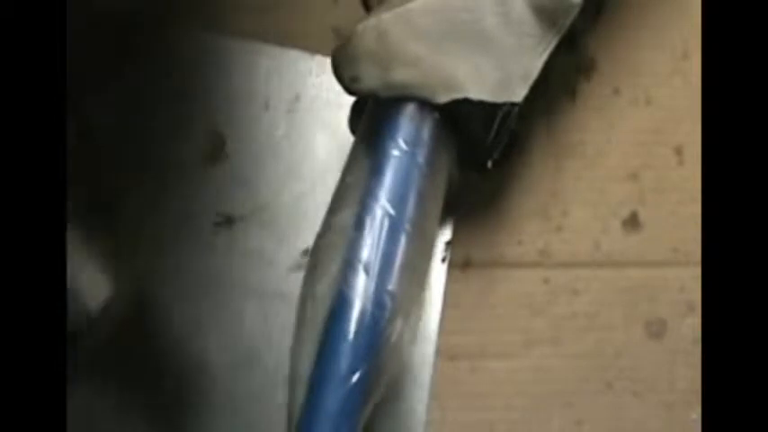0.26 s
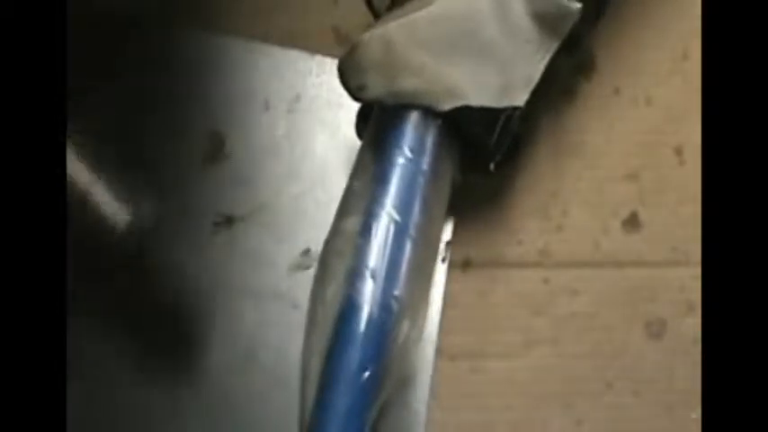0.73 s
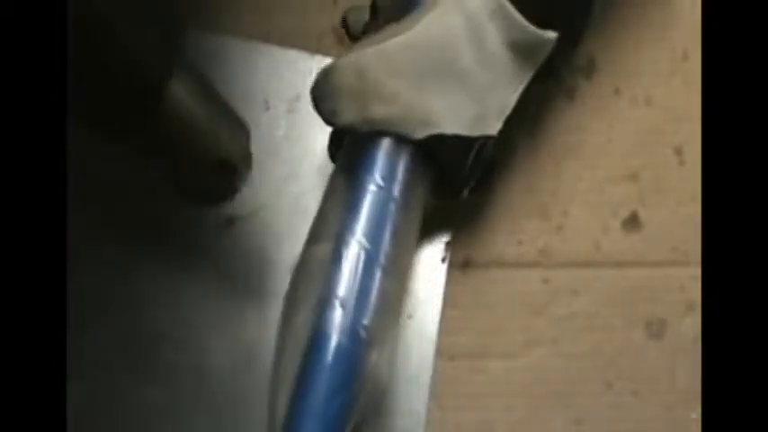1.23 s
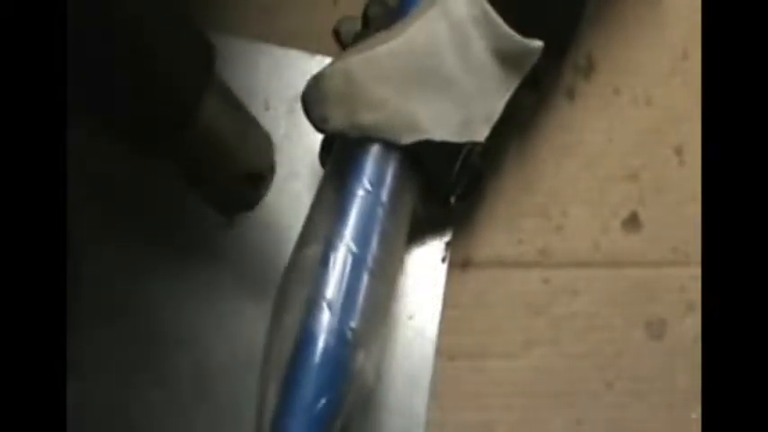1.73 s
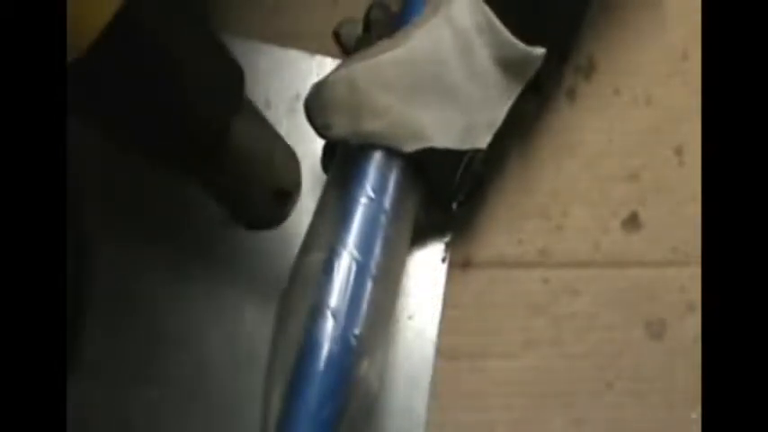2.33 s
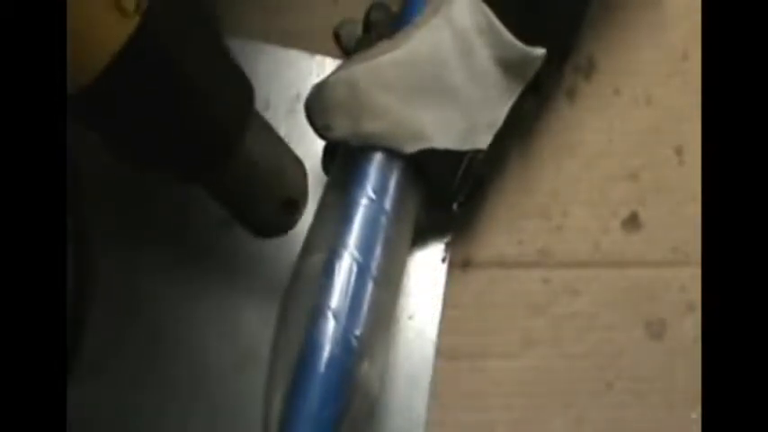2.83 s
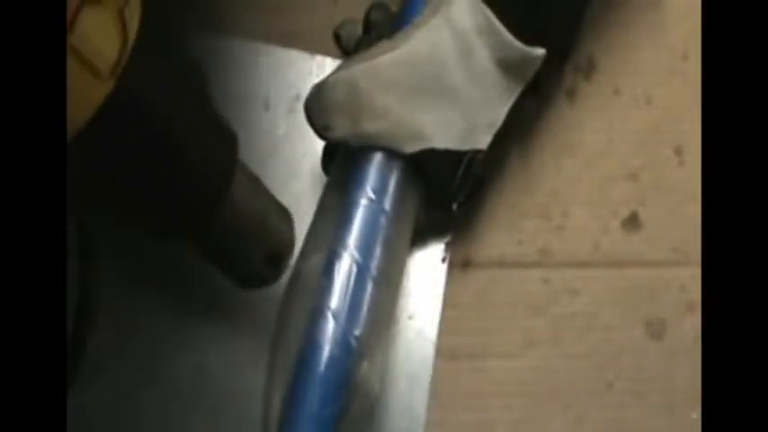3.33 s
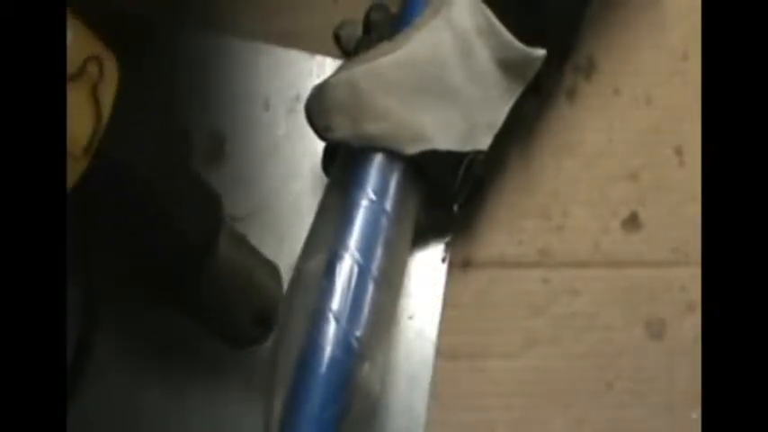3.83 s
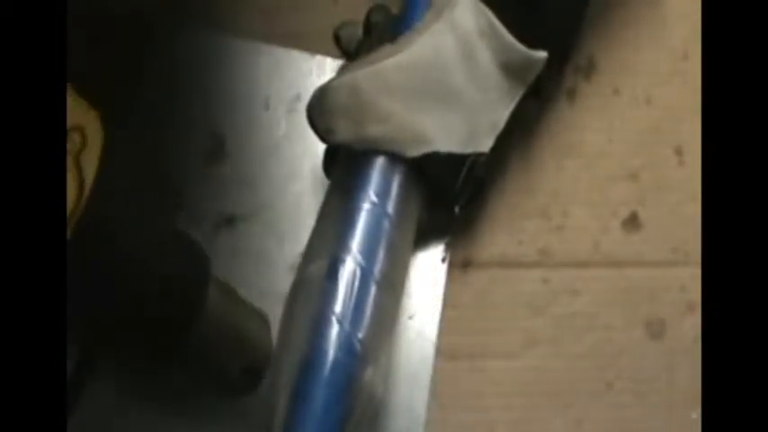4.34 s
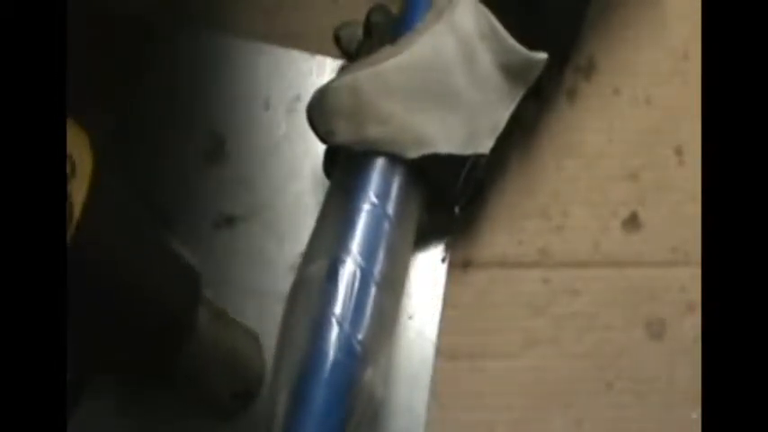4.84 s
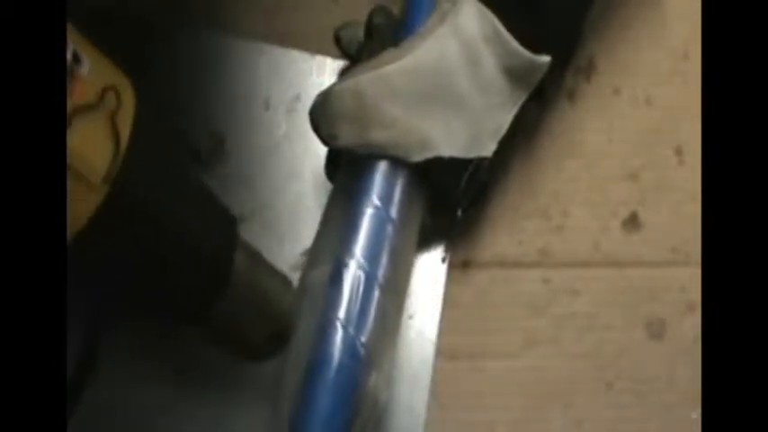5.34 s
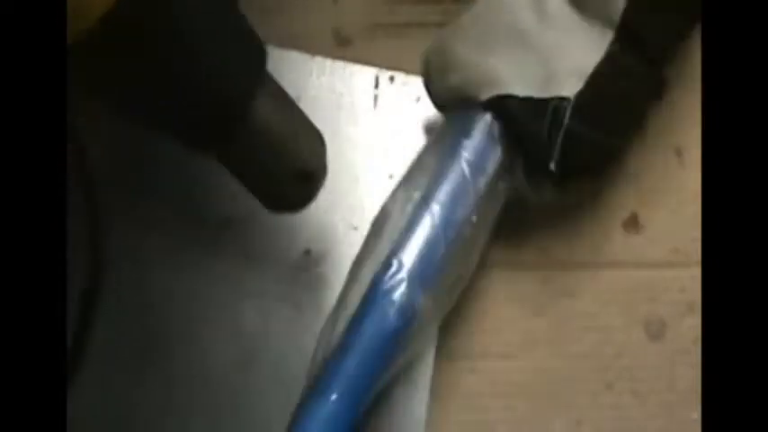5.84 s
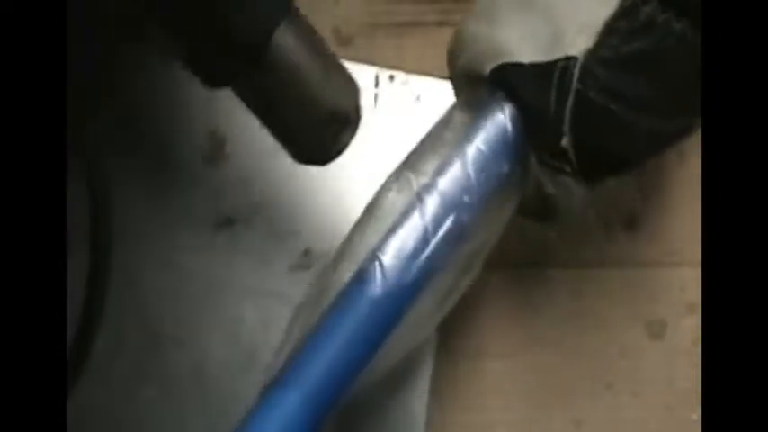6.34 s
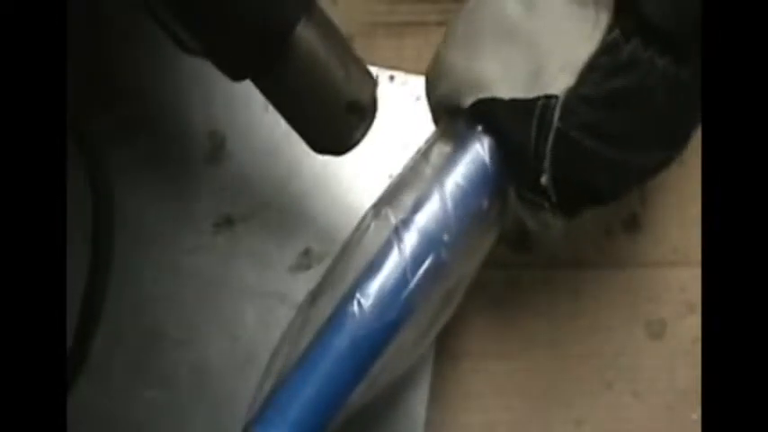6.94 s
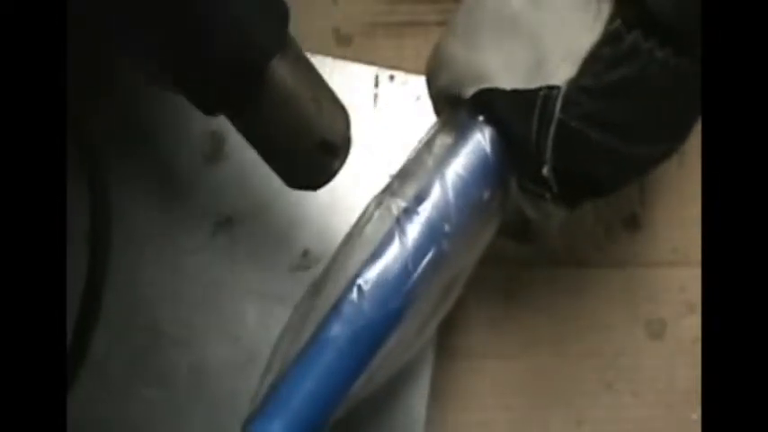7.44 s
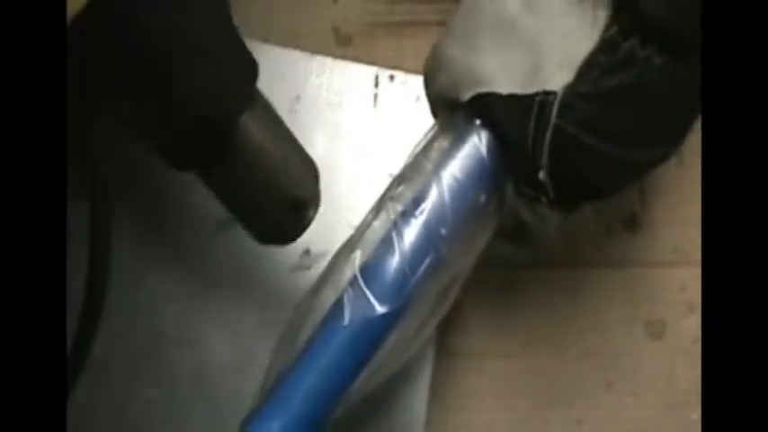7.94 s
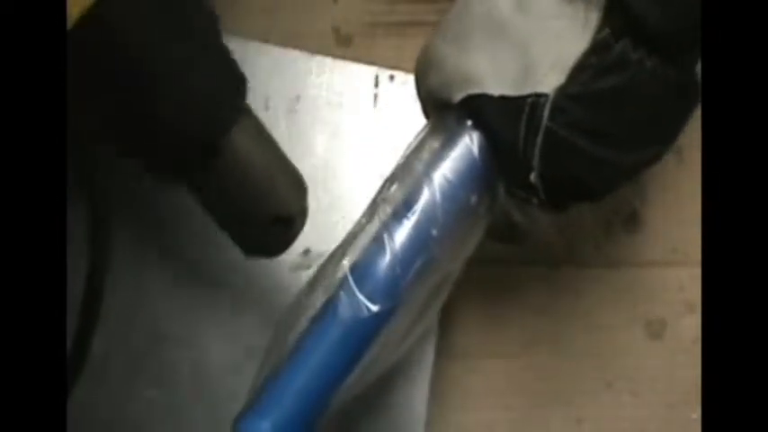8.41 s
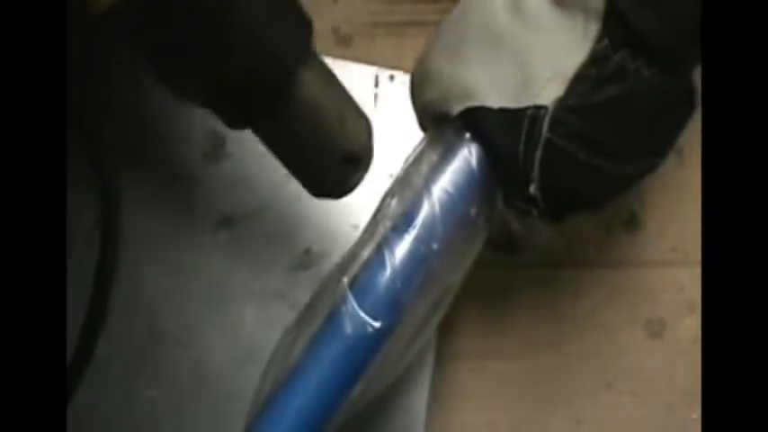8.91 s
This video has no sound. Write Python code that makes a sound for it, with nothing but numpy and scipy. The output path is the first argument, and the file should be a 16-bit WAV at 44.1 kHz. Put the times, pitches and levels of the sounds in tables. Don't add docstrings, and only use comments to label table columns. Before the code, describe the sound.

Close-up of a hot-air gun: fading air, several small plastic clicks, then a sharp switch snap and rapid rising whine. Steady turbulent air shifts in colour as the gun is waved near plastic, with tiny dropouts. After a dull bench knock the sound cuts to a sped-up, shriller version. Distant horn chords sound twice, faintly, above low workshop rumble and engine drone. A small camera captures it in stereo.

```python
import sys
import numpy as np
from scipy import signal
from scipy.fft import rfft, irfft, next_fast_len
from scipy.io import wavfile
from scipy.ndimage import uniform_filter1d, minimum_filter1d, map_coordinates

SR = 44100
rng = np.random.default_rng(int(sys.argv[2]) if len(sys.argv) > 2 else 0)


def volts(x):
    e = np.asarray(x, float) / 20
    return 10 ** e


def transcribe(u):
    v = np.clip(np.atleast_2d(u).T, -1, 1)
    q = np.round(v * 32767).astype(np.int16)
    wavfile.write(sys.argv[1], SR, q)


N = 404397
T = np.arange(N) / SR

NORMAL, FAST = 1, 1.7
SCENE_CHANGE_S, NEW_POSE_S = 5.26, 5.855
ON_S = 0.4615
BESIDE = np.array([[0.5], [-0.5]])

PART_EDGES_HZ = [488, 1400, 2400, 4400, 10040]
FILL_S = [0.17, 0.22, 0.17, 0.12]
# time_s, jet_towards_microphone_db, fan_towards_microphone_db, lean_to_left_db
POSE = [(.75, -1, 0, 0.7), (1.0, -1, -1, -0.2), (1.35, 0.5, 3, 0), (1.83, -0.5, -4.5, -0.5),
        (2.1, 1.5, 1, -0.5), (2.95, 1, -1.5, -0.5), (3.3, 1.5, 3.5, -0.2), (3.75, 0.5, 3.5, 0),
        (4.3, 0.5, 4, 0.5), (4.7, 0, 5.5, 0.5), (5.2, -0.5, 4.5, 0), (5.55, 2, 5, -0.5), (5.9, -1.5, 1, -1),
        (6.4, -1.5, 0.5, -1.5), (7.3, 0, 2.5, -1), (8.2, -0.5, 2, -0.5), (8.7, 0.5, 2, -1.5),
        (9.1, 1, 4, -1.3)]


def unit(x):
    return x / np.sqrt(np.mean(x ** 2) + 1e-20)


def steady(x):
    power = uniform_filter1d(np.mean(x ** 2, axis=0), size=SR // 3)
    return x / np.sqrt(np.abs(power) + 1e-20)


def along(points, hz):
    f, v = np.transpose(points)
    return np.interp(np.log(hz + 1), np.log(f + 1), v)


def curves(rows):
    s, *columns = np.transpose(rows)
    return [np.interp(T, s, column) for column in columns]


def wobble(rate):
    coarse = T[::16]
    knots = rng.standard_normal(int(N * rate / SR) + 4)
    return np.interp(T, coarse, map_coordinates(knots, [coarse * rate]))


def filtered(x, response):
    m = next_fast_len(N + 8192)
    return irfft(rfft(x, m) * response(np.fft.rfftfreq(m, 1 / SR)), m)[..., :N]


def blurred_noise(shape, across, along_time):
    field = uniform_filter1d(rng.standard_normal(shape), size=across, axis=0)
    return uniform_filter1d(field, size=along_time, axis=1)


def rush(colour, speed, patchy_db):
    # pitch_hz, likeness (0 to 1)
    likeness = [(30, 0.76), (60, 0.94), (150, 0.68), (300, 0.85), (700, 0.89), (2000, 0.82), (5000, 0.93),
                (9000, 0.78)]
    z = signal.stft(rng.standard_normal((2, N)), nperseg=1024)[2]
    patches = unit(blurred_noise(z.shape[1:], 4, 36))
    fine = unit(blurred_noise(z.shape[1:], 2, 12))
    hz = np.linspace(0, SR / 2, len(fine))[:, None]
    depth = np.clip(hz / (speed * 2250) - 0.5, 0, 1)
    streaks_db = 2.5 * np.minimum(fine, 0.7)
    holes_db = -14 * (fine < -2.1)
    gain_db = patchy_db * patches + depth * (streaks_db + holes_db)
    pair = signal.istft(z * volts(gain_db), nperseg=1024)[1][:, :N]

    def spread(hz):
        angle = np.arccos(np.clip(along(likeness, hz / speed), -1, 1)) / 2
        return colour(hz) * [np.cos(angle), np.sin(angle)]

    mid, side = filtered(pair, spread)
    return np.array([mid + side, mid - side])


def power_db(fill_s, coast_db_per_s=-70, rest_db=-28):
    coasting = -3 + coast_db_per_s * T
    climbing = -22.5 * np.exp((ON_S - T) / fill_s)
    climbing = climbing - 5 * np.clip((0.562 - T) / 0.012, 0, 1)
    return np.maximum(np.where(T < ON_S, coasting, climbing), rest_db)


def shop(level_db, rumble, speed):
    db = level_db + 0.23 * power_db(0.81) + 4.5 * np.exp(-T / 0.29)
    return volts(db) * steady(rush(lambda hz: volts(along(rumble, hz)), speed, patchy_db=1.0))


def engine_hum():
    # time_s, level_db
    load = [(5.3, -52), (6.2, -55.5), (6.45, -45.5), (7.7, -46.5), (7.9, -65), (8.07, -42), (9.1, -45)]
    phase = 2 * np.pi * 158.8 * T + 1.0 * wobble(4) + BESIDE / 2
    return volts(curves(load)[0] + 4.0) * np.sin(phase)


def locomotive_drone():
    # pitch_hz, level_db
    firing = [(43.7, -45.5), (58.2, -46.5), (72.7, -54.5), (87.2, -50), (102, -68), (116.4, -52.5),
              (189, -52)]
    out = 0
    for hz, db in firing:
        level_db = db + 2.5 + 1 * (T - 7.5) + 1.9 * wobble(1.8)
        phase = 2 * np.pi * (hz * T + rng.random()) + 0.11 * wobble(2.7)
        out = out + volts(level_db) * np.sin(phase)
    return out


def train_horn():
    pipe_hz = [331, 389, 520.5, 662.3]
    pipe_db = [-50, -53, -48, -52]
    # pipe_number, peak_s, half_length_s, level_db
    echo_swells = [(0, 6.13, .25, 7), (0, 7.3, .12, 7), (0, 7.88, 0.12, 6), (0, 8.27, 0.092, 4.5),
                   (1, 6.27, .16, 12), (1, 8.02, 0.12, 11.5), (1, 8.27, 0.11, 6), (2, 5.66, 0.069, -2),
                   (2, 6.05, 0.21, 14), (2, 5.4, 0.14, 5), (2, 7.33, 0.16, 7), (2, 7.58, 0.058, 0),
                   (2, 7.76, .06, 8), (2, 8.06, 0.076, 7), (3, 5.3, .1, 7), (3, 5.68, 0.15, 5),
                   (3, 6, 0.35, 13.5), (3, 7.58, 0.069, 15), (3, 7.78, .13, 12), (3, 8.15, .07, 16),
                   (3, 8.36, .09, 10)]
    # start_s, end_s
    blasts = [
        (4.98, 6.4),
        (7.05, 8.5),
    ]
    speed = np.where(T < SCENE_CHANGE_S, NORMAL, FAST)
    blowing = sum(np.clip(np.minimum(T - a, b - T) / 0.067, 0, 1) for a, b in blasts)
    out = 0
    for k, hz in enumerate(pipe_hz):
        tone = np.sin(2 * np.pi * hz * np.cumsum(speed) / SR + 0.41 * wobble(9.6) + BESIDE)
        level_db = pipe_db[k] + 6.0 + 1.5 * wobble(9)
        for pipe, s, half, db in echo_swells:
            if round(pipe) == k:
                level_db = level_db + db * np.exp(-((T - s) / half) ** 2)
        out = out + blowing * volts(level_db) * tone
    return out


def outside():
    return train_horn() + (T > SCENE_CHANGE_S) * (engine_hum() + locomotive_drone())


def handling():
    # pitch_hz, width_hz, level_db
    handle_modes = [(2250, 500, -3), (3250, 400, 2), (5760, 500, -3), (8300, 500, 0)]
    # start_s, peak_db, low_knock_db,
    # fade_by_60_db_s
    clicks = [(0.1392, -18, 7.5, 0.03), (.244, -21, 0, .03), (.304, -35, -17, .03),
              (0.3606, -15.5, -30, 0.018), (.389, -25, -4, .03), (.424, -25, -20, 0.52),
              (0.45, -20.5, -20, 0.13), (0.4619, -12, -30, 0.039)]
    # pitch_hz, level_db, fade_by_60_db_s
    contact_modes = [(706, -11.5, 0.047), (1490, -17, 0.044), (2450, -27, 0.041), (2750, -18, 0.044),
                     (3300, -11, 0.035), (3900, -2, 0.03), (4140, -1.5, 0.025), (5730, -15, .022),
                     (8470, -8, 0.032)]
    # start_s, level_db, pitch_hz, fade_by_60_db_s
    bumps = [
        (4.87, -18, 54, 0.17),
    ]
    out = np.zeros(N)
    t = T[:SR // 4]
    f = np.fft.rfftfreq(len(t), 1 / SR)
    handle = 1
    for k, (c, w, db) in enumerate(handle_modes):
        handle = handle + (-1) ** k * volts(db) * 1j * f * w / (c * c - f * f + 1j * f * w)

    def add(s, sound):
        out[round(s * SR):][:len(t)] += sound

    for s, db, knock_db, t60 in clicks:
        burst = rng.standard_normal(len(t)) * volts(-60 * t / t60) * (1 - np.exp(-t / (0.03 * t60)))
        crack = irfft(rfft(burst) * handle, len(t))
        knock = volts(knock_db - 60 * t / 0.015) * np.sin(2 * np.pi * 860 * t) * (1 - np.exp(-t / 0.0015))
        add(s, volts(db) * (crack / np.abs(crack).max() + knock))
    snap = sum(volts(-10.5 + db - 60 * t / t60) * np.sin(2 * np.pi * hz * t) for hz, db, t60 in contact_modes)
    add(ON_S, (1 - np.exp(-t / 0.0012)) * snap)
    for s, db, hz, t60 in bumps:
        add(s, volts(db - 60 * t / t60) * np.sin(2 * np.pi * hz * t) * (1 - np.exp(-t / 0.01)))
    return volts(3 * BESIDE) * filtered(out, lambda hz: hz < PART_EDGES_HZ[-1])


def ports(x, speed):
    # pitch_hz, left_minus_right_db
    level_gap = [(60, 7.5), (300, -8), (640, 5), (1400, 2), (3100, 3), (6800, 0.4), (10000, 1)]
    # pitch_hz, left_leads_by_radians
    phase_gap = [(50, -0.068), (690, -0.66), (1210, -0.71), (1460, 0.047), (1810, -0.24), (2500, 0.88),
                 (3010, 0.22), (3620, -0.45), (7750, 0.39), (8870, 0.27)]

    def response(hz):
        gain = volts(BESIDE * along(level_gap, hz / speed))
        return gain * np.exp(1j * BESIDE * along(phase_gap, hz / speed))

    return filtered(x, response)


def stalls_db():
    # start_s, length_s, level_db
    stalls = [(1.159, 0.062, -3.5), (1.595, 0.087, -4), (1.694, 0.035, -5), (1.799, 0.043, -4),
              (1.838, 0.071, -3.5), (1.935, 0.01, -8), (2.004, 0.053, -4.5), (2.25, 0.021, -2),
              (2.692, 0.024, -4), (3.648, 0.069, -5), (3.87, 0.011, -9), (4.068, 0.016, -5),
              (4.729, 0.037, -5.5), (5.329, 0.015, -5), (5.493, 0.039, -2), (6.26, 0.012, -8),
              (6.308, 0.044, -6), (6.383, 0.029, -4), (6.582, 0.029, -5), (6.756, 0.021, -7.5),
              (6.807, 0.028, -5.5), (6.946, 0.044, -5.5), (7.469, 0.021, -4), (7.56, 0.059, -4.5),
              (7.699, 0.021, -6), (7.977, 0.014, -9), (8.059, 0.021, -6.5), (8.483, 0.011, -4),
              (8.719, 0.019, -7.5), (9.024, 0.013, -7.5)]
    out = 0
    for s, length, db in stalls:
        out = out + db * np.clip(np.minimum(T - s + 0.002, s + length + 0.0025 - T) / 0.0063, 0, 1)
    return out


def barrel(tone, pipes):
    def colour(hz):
        peaks = sum(volts(db / 3) * w * w / (w * w + 4 * (hz - c) ** 2) for c, w, db in pipes)
        return volts(along(tone, hz)) * (1 + 1.02 * peaks) * (hz < 15790)

    return colour


def airflow(colour, turns, speed, noise_db):
    coast_db_per_s = [-65, -66, -76, -58]
    resting_db = [-26, -26, -30, -23]
    jet_share = [0.075, .2, 0.95, .1]
    fan_share = [0.28, .15, 0.02, 0.083]
    roar = rush(colour, speed, patchy_db=0.8)
    mains_hz = 59.9
    throb = 1 + 0.078 * np.sin(2 * np.pi * mains_hz * speed * T) + 0.07 * np.sin(2 * np.pi * turns)
    flutter_db = 0.85 * stalls_db() + np.minimum(0.5 * wobble(20) + 1.1 * wobble(45), 1.3)
    jet_db, fan_db, _ = curves(POSE)
    out = 0
    for k, share in enumerate([0.19, 0.32, 0.95, 0.45]):
        low, high = PART_EDGES_HZ[k] * speed, PART_EDGES_HZ[k + 1] * speed
        part = filtered(roar, lambda hz: (hz > low) & (hz <= high))
        db = noise_db[k] + power_db(FILL_S[k], coast_db_per_s[k], resting_db[k])
        db = db + jet_share[k] * jet_db + fan_share[k] * fan_db + share * flutter_db
        out = out + volts(db) * steady(part) * throb ** share
    return out


def whine(turns, blade_db, twice_db, orders, rest_db, late_db):
    out = 0
    for multiple, db in orders:
        k = round(multiple)
        if k in (2, 3):
            continue
        if k in (5, 10):
            level_db = blade_db if k == 5 else twice_db
            blur = 0.03 * k
        else:
            level_db = rest_db + late_db * min(k / 16, 1) + db + 0.7 * wobble(2.524) + 0.15 * k * wobble(30)
            blur = 0.004 * k * k
        jitter = 0.61 * blur * wobble(90 if k > 12 else 40)
        tone = np.sin(2 * np.pi * (k * turns + rng.random()) + jitter)
        out = out + np.sqrt(2) * volts(level_db) * tone
    return out


def barrel_howl():
    # start_s, end_s, pitch_hz, climb_hz_per_s, level_db
    howl_shape = (.565, .76, 3010, 450, -29.5)
    start, end, hz, climb, db = howl_shape
    swell = np.clip(np.minimum((T - start) / 0.09, (end - T) / 0.02), 0, 1)
    level = swell * volts(db + 1.8 * wobble(60))
    since = T - start
    return level * np.sin(2 * np.pi * (hz + climb * since / 2) * since + 1.1 * wobble(60))


def gun(orders, colour, speed, noise_db, other_db, octave_db):
    # time_s, turns_hz
    shaft = [(1, 179.4), (1.55, 178.4), (1.95, 179.6), (2.6, 178.2), (2.97, 176.6), (3.35, 179.5),
             (4.4, 179.6), (5.2, 177.5), (5.5, 178.8), (5.76, 177.5), (5.95, 178.5), (7.05, 178.7),
             (7.3, 177.9), (7.62, 179.3), (8.12, 179.2), (8.3, 177.6), (8.55, 179.6), (9.1, 179.3)]
    missing_hz = 82 * np.exp(-np.abs(T - ON_S) / 0.17)
    hz = curves(shaft)[0] + 0.25 * wobble(3) - missing_hz
    turns = np.cumsum(speed * hz) / SR
    jet_db, fan_db, lean_db = curves(POSE)
    base_db, flicker_db = -34, 1.6
    hidden_db = -7 * np.clip((0.7 - T) / 0.08, 0, 1) * (T > 0.3)
    blade_db = base_db + fan_db + 2.6 * power_db(0.06) + hidden_db + flicker_db * wobble(9)
    twice_db = base_db + octave_db + 0.48 * fan_db + 3.4 * power_db(0.12) + 1.1 * flicker_db * wobble(9.7)
    rest_db = jet_db + power_db(FILL_S[2]) + other_db + stalls_db()
    late_db = -20 * np.clip((1.1 - T) / 1.8, 0, 1) * (T > ON_S)
    tones = whine(turns, blade_db, twice_db, orders, rest_db, late_db) + barrel_howl()
    return volts(lean_db * BESIDE) * ports(tones + airflow(colour, turns, speed, noise_db), speed)


def shaded(x):
    # peak_s, half_length_s, pitch_hz, level_db
    swells = [(0.635, 0.035, 800, 9), (0.78, 0.15, 2500, 5.5), (0.86, 0.15, 1020, 5),
              (0.93, 0.25, 2710, 6.5), (1.19, 0.25, 3570, 3.0), (1.19, 0.4, 3190, -5.5),
              (1.42, 0.9, 1980, -2.5), (1.46, 0.25, 3880, 4.0), (1.47, 0.9, 4480, 3.0),
              (1.76, 0.25, 1640, 3.0), (1.9, 0.6, 4090, 3.5), (2.16, 0.25, 3830, -4.0),
              (2.38, 0.6, 3060, 4.0), (2.63, 0.4, 2150, -3.0), (2.77, 0.25, 1720, 3.5),
              (2.83, 0.15, 3140, 3.0), (2.91, 0.15, 3920, -5.0), (3.38, 0.6, 3360, 3.0),
              (3.41, 0.25, 4690, 6.5), (3.55, 0.6, 2670, -3.5), (3.66, 0.4, 2970, -4.0),
              (3.7, 0.4, 1120, -2.5), (4.13, 0.25, 3880, 3.0), (4.42, 0.25, 1720, -4.0),
              (4.49, 0.9, 2020, 3.0), (4.6, 0.9, 4130, -3.5), (4.73, 0.9, 4520, -4.0), (5.4, 0.2, 4560, -5),
              (5.6, 0.25, 3060, -3), (5.41, 0.15, 6930, -3.5), (5.73, 0.15, 3960, -4.0),
              (5.74, 0.15, 6120, -4.5), (5.77, 0.15, 4780, 4.0), (6.15, 0.25, 7190, 3.5),
              (6.26, 0.4, 5990, 4.5), (6.42, 0.25, 6680, -5.0), (6.76, 0.25, 3490, -4.5),
              (6.82, 0.6, 4440, 3.0), (6.9, 0.4, 5210, 4.0), (6.91, 0.4, 7280, -4.0),
              (6.93, 0.15, 6120, -4.5), (8.04, 0.4, 4310, -5.5), (8.06, 0.25, 7150, 5.5),
              (8.09, 0.4, 3620, 3.5), (8.18, 0.4, 5300, -4.5), (8.68, 0.25, 4870, -3.0),
              (8.71, 0.25, 6630, 5.0), (8.94, 0.25, 6030, -4.5), (8.98, 0.15, 4260, 4.5),
              (8.98, 0.25, 7150, -4.0)]
    # pitch_hz, level_db
    lasting_colour = [(3990, -4.5), (10360, -3), (11040, -7), (13310, -8), (5960, 0), (7180, 4), (9200, 2),
                      (11560, 2.5), (14300, 3.5)]
    hz, t, z = signal.stft(x, SR, nperseg=1024)

    def bell(c, speed):
        return np.exp(-((hz[:, None] - c) / (110 * speed)) ** 2)

    changed = t > SCENE_CHANGE_S
    db = 0
    for s, half, c, gain in swells:
        late = s > SCENE_CHANGE_S
        moment = np.exp(-((t - s) / half) ** 2) * (changed == late)
        db = db + gain * bell(c, FAST if late else NORMAL) * moment
    db = db + sum(gain * bell(c, FAST) for c, gain in lasting_colour) * changed
    return signal.istft(z * volts(db), nperseg=1024)[1][:, :N]


def scene():
    # shaft_multiple, level_db
    orders_first, orders_last = [(1, -14), (2, -19), (3, -19), (4, -5), (5, 0), (6, -0.5), (7, -29),
                                 (8, -19), (9, -6), (10, -3), (11, -3.5), (12, -39), (13, -16), (14, -1),
                                 (15, -5), (16, 1), (17, -1), (18, 4.5), (19, -1.5), (20, -16.5), (21, 7),
                                 (22, -15), (23, 4.5)], [(1, -18), (2, -13), (3, -9), (4, -10), (5, 0), (6, -6.5),
                                                   (7, -12.5), (8, -10), (9, -30), (10, -6), (11, -15),
                                                   (12, -17), (13, -19), (14, -17), (15, -10), (16, -1.5),
                                                   (17, -3.5), (18, -8), (19, -20), (20, -6), (21, -2.5),
                                                   (22, -28), (23, -7)]
    # pitch_hz, level_db_per_hz
    tone_first, tone_middle, tone_last = [(290, -81), (500, -22), (879, -4.5), (959, -9), (1310, -13),
                                          (1530, -19), (1750, -13), (2110, -18), (2340, -18), (2460, -18),
                                          (3120, -14), (4110, -13), (4430, -16), (6370, -20), (7130, -13.5),
                                          (10000, -19), (13000, -58), (22000, -120)], [(500, -43), (850, -19), (904, -21), (937, -22),
                                                          (1100, -14), (1490, -6), (1900, -15), (3060, -10),
                                                          (3680, -11), (5310, -5), (7030, -8.5),
                                                          (8440, -17.5), (12600, -13), (15700, -17.5)], [(500, -36), (850, -21),
                                                                          (1050, -20), (1100, -15),
                                                                          (1490, -7.5), (2000, -17),
                                                                          (3030, -17.5), (3960, -16),
                                                                          (4260, 1.5), (4810, 0),
                                                                          (5710, -3.5), (6610, 1),
                                                                          (8440, -11.5), (12800, -11),
                                                                          (15700, -13.5)]
    # pitch_hz, width_hz, level_db
    pipes_first, pipes_middle, pipes_last = [(800, 43, -14), (1730, 53, -15), (1998, 36, -8),
                                             (1984, 22, 10), (2150, 57, -9), (2540, 28, 14),
                                             (3050, 110, 6.5), (3454, 23, -1), (3812, 17, 13),
                                             (4080, 44, -15.5), (5300, 8.8, -7), (5710, 220, -2.5),
                                             (6890, 170, 1.0), (7460, 39, -5.5), (8870, 56, -12)], [(3130, 77, 9), (3400, 100, 9), (4230, 62, 29),
                                                              (5170, 40, -4), (5300, 230, -13),
                                                              (6350, 88, 1), (6830, 430, -11.5),
                                                              (9600, 279, -13), (12000, 270, -1),
                                                              (12900, 190, -9), (14000, 420, -14)], [(1818, 32, -2),
                                                                               (3020, 41, -8),
                                                                               (3480, 120, -18),
                                                                               (4850, 370, -13),
                                                                               (6110, 24, 22),
                                                                               (6180, 19, -10),
                                                                               (6630, 46, 6),
                                                                               (9650, 360, -4),
                                                                               (11930, 98, -6),
                                                                               (12400, 63, 5),
                                                                               (12950, 380, 8),
                                                                               (14200, 200, 2)]
    # pitch_hz, level_db_per_hz
    rumble_before, rumble_after = [(12, -19), (20, 3), (64, -8), (107, 2), (145, -10), (176, -8),
                                   (238, -12.5), (392, -4), (513, -13.5), (600, -12.5), (780, -22),
                                   (1320, -120)], [(12, -37), (25, -8), (50, -6.5), (120, -8.5),
                                                     (165, -2.5), (260, -7.5), (400, -11), (555, -8),
                                                     (690, -8), (780, -14), (870, -16.5), (1000, -22),
                                                     (2200, -120)]
    first = gun(orders_first, barrel(tone_first, pipes_first), NORMAL,
                noise_db=[-28.5, -28.5, -23.5, -27.5], other_db=-40.0, octave_db=-2.0)
    second = gun(orders_first, barrel(tone_middle, pipes_middle), FAST,
                 noise_db=[-29.5, -27.5, -22.5, -28.0], other_db=-40.5, octave_db=-1)
    third = gun(orders_last, barrel(tone_last, pipes_last), FAST,
                noise_db=[-28.5, -30.5, -21.5, -28.0], other_db=-34.5, octave_db=-6)
    fast = np.clip((T - SCENE_CHANGE_S) / 0.012 + 0.5, 0, 1)
    moved = np.clip((T - NEW_POSE_S) / 0.06 + 0.5, 0, 1)
    sped_up = second * np.sqrt(1 - moved) + third * np.sqrt(moved)
    blast = first * np.sqrt(1 - fast) + sped_up * np.sqrt(fast)
    room = shop(-38, rumble_before, NORMAL) * np.sqrt(1 - fast) + shop(-40, rumble_after, FAST) * np.sqrt(fast)
    return shaded(blast) + room + outside() + handling()


def starved(x):
    # pitch_hz, mid_db, side_db
    weakest_kept = [(98.6, -19, 3), (216, -7.5, -8), (408, -6, -12), (597, -16, -21), (763, -8, -14),
                    (895, -11, -15), (4000, -19, -8.5), (6000, -4, -9.5), (9000, -15, -8.5),
                    (15000, -15.5, -8.5)]
    hz, _, z = signal.stft(np.array([x[0] + x[1], x[0] - x[1]]) / 2, SR, nperseg=2048)
    power = uniform_filter1d(uniform_filter1d(np.abs(z) ** 2, size=3, axis=1), size=3, axis=2)
    masker = minimum_filter1d(uniform_filter1d(power[0], size=40, axis=0), size=5, axis=1)
    edge_hz, *least_db = np.transpose(weakest_kept)
    least = np.array([volts(2 * np.interp(hz, edge_hz, db))[:, None] for db in least_db])
    mood_db = 5 * unit(blurred_noise(masker.shape, 3, 4)) * (hz[:, None] < 1000)
    keep = power > volts(2 * mood_db) * masker * least
    around = uniform_filter1d(masker + 1e-20, size=15, axis=1)
    valley_db = 10 * np.log10(uniform_filter1d(power[0], size=15, axis=1) / around + 1e-9)
    luck = unit(blurred_noise(masker.shape, 5, 4))
    lost = (luck + 0.3 * valley_db < -2.9) & (hz[:, None] > 4500)
    mid, side = signal.istft(z * (keep & ~lost), nperseg=2048)[1][:, :N]
    return np.array([mid + side, mid - side])


def hiss_puffs():
    # time_s, level_db
    puffs = [(.216, -52), (.958, -41), (1.57, -53), (1.8, -53), (2.22, -50), (2.452, -38), (2.96, -38),
             (3.192, -43), (3.696, -44), (3.99, -44), (4.03, -45), (4.58, -58)]
    noise = rng.standard_normal(N)
    hiss = unit(filtered(noise, lambda hz: (hz > PART_EDGES_HZ[-1]) & (hz < 11000)))
    return hiss * sum(volts(db - 7) * np.clip(1.5 - np.abs(T - s) / 0.0041, 0, 1) for s, db in puffs)


def top_cut(x):
    return signal.sosfilt(signal.butter(12, 15880, fs=SR, output="sos"), x)


def record(dry):
    mix = filtered(starved(dry) + hiss_puffs(), lambda hz: hz < 15800)
    return top_cut(mix)


dry = scene()
out = record(dry)
transcribe(out)
```